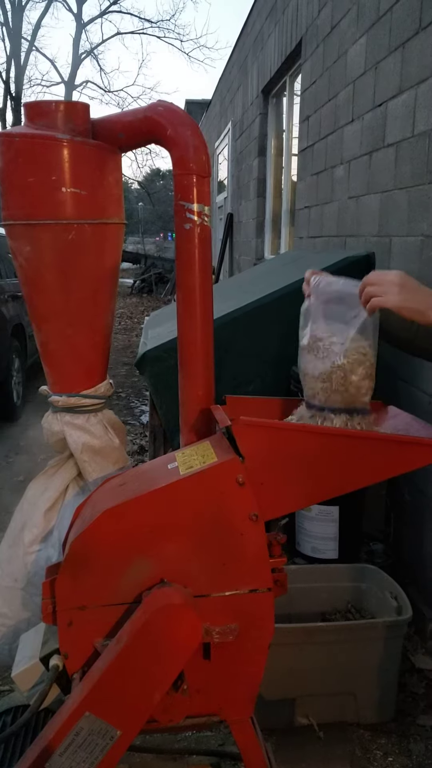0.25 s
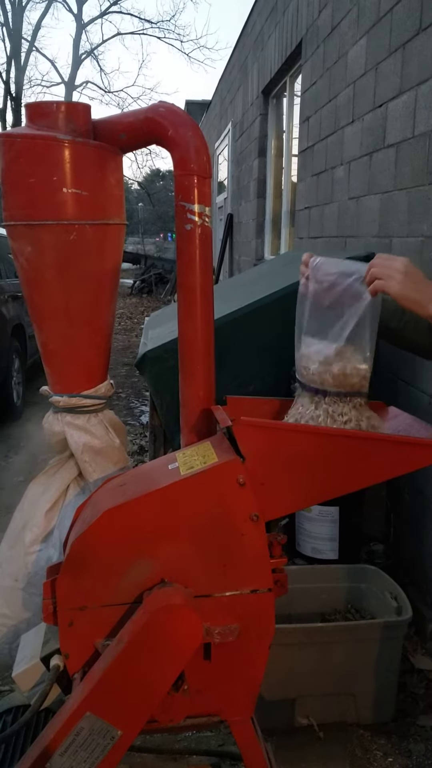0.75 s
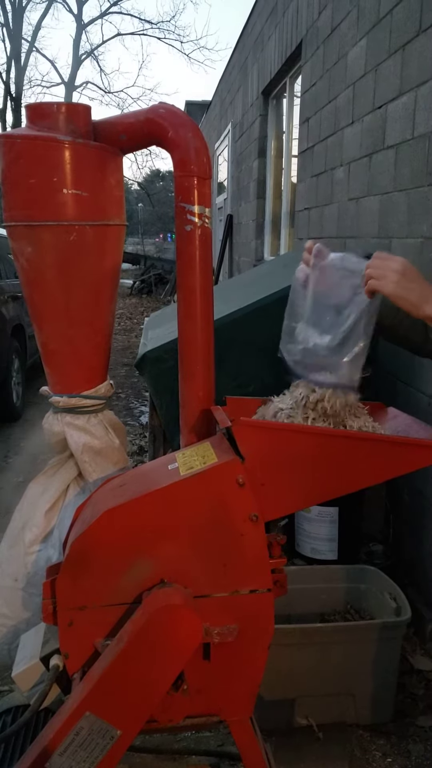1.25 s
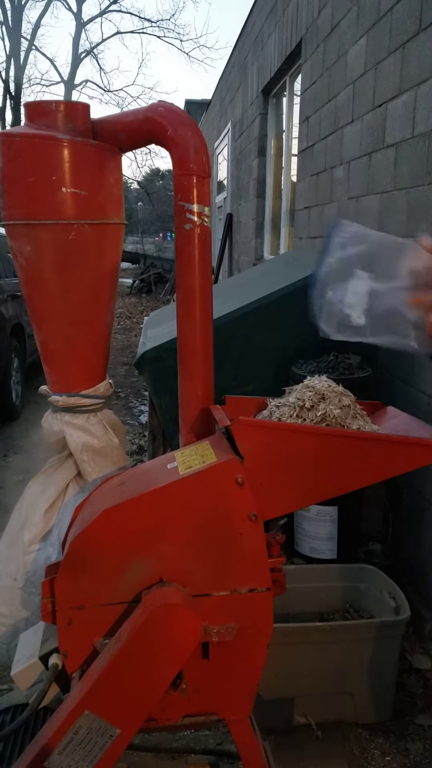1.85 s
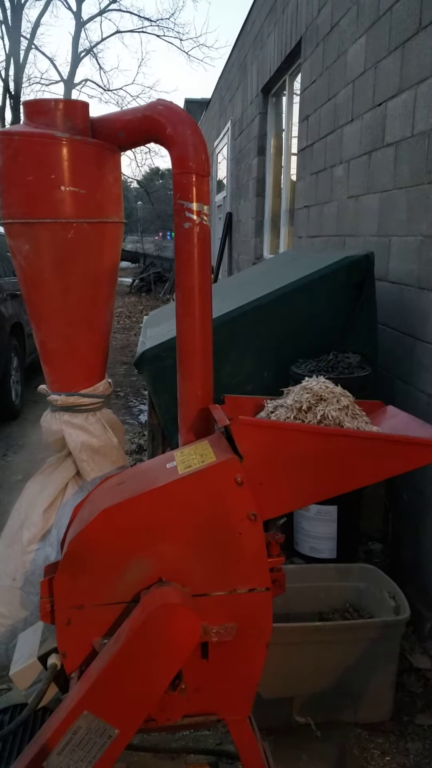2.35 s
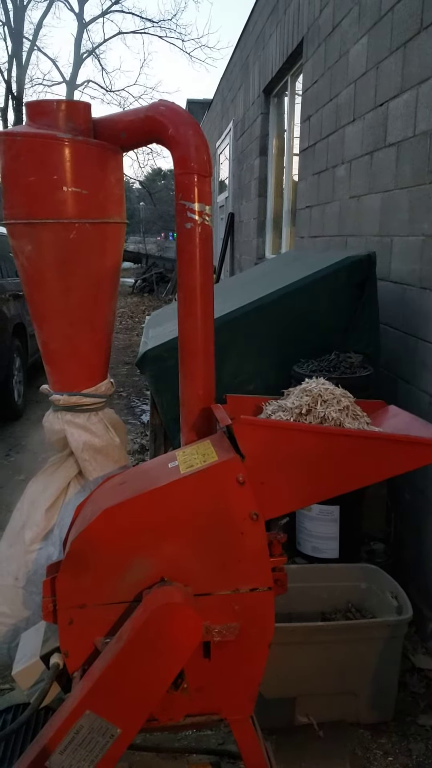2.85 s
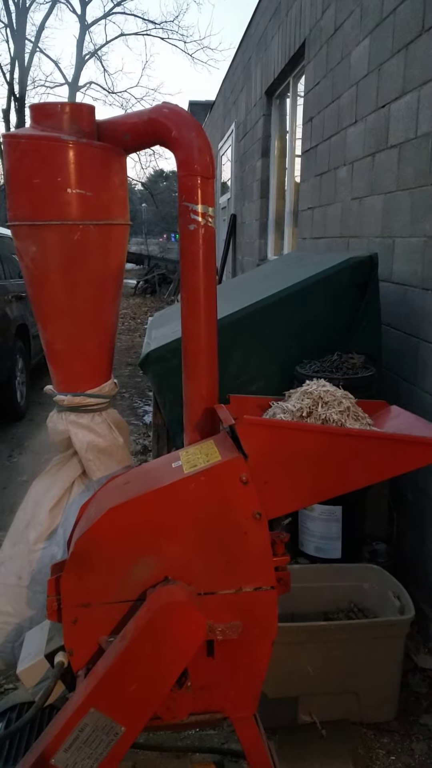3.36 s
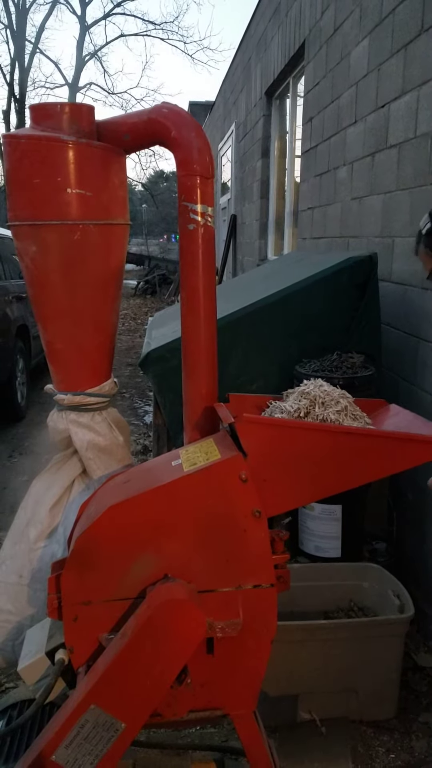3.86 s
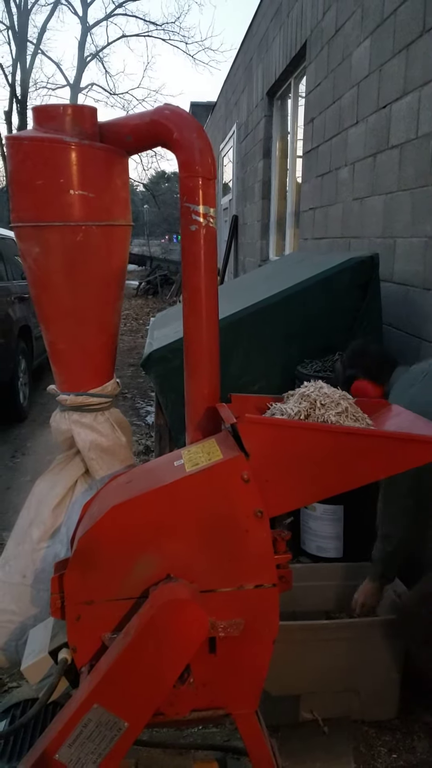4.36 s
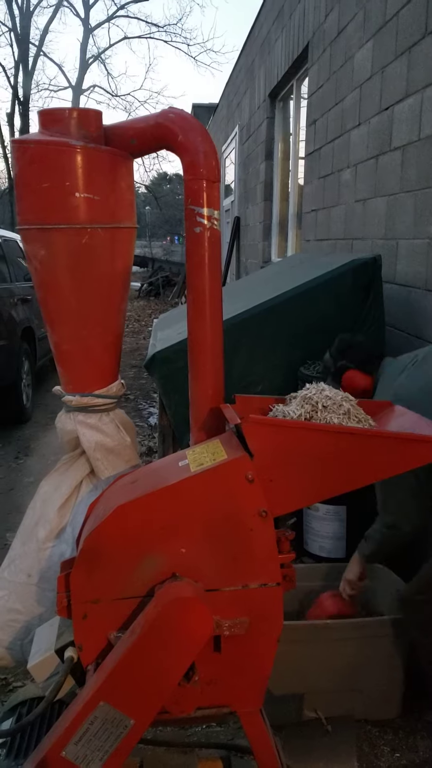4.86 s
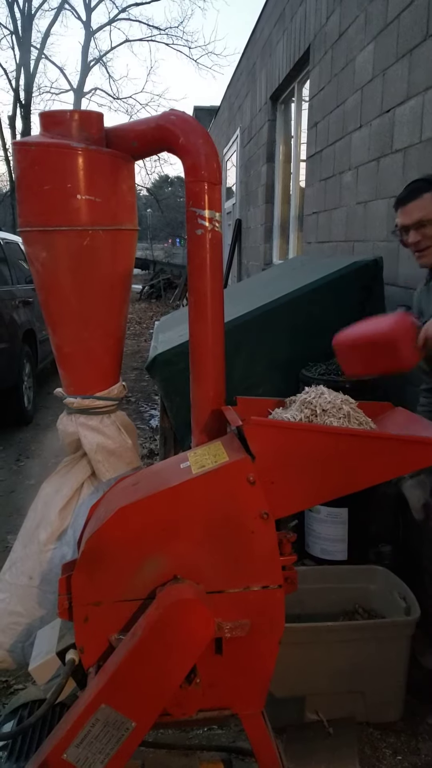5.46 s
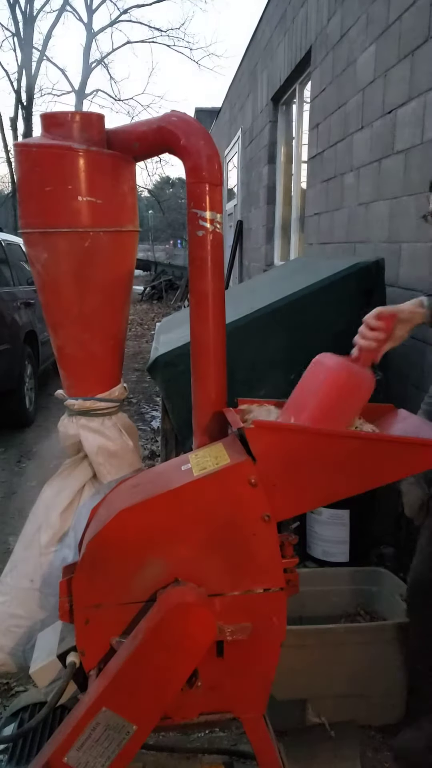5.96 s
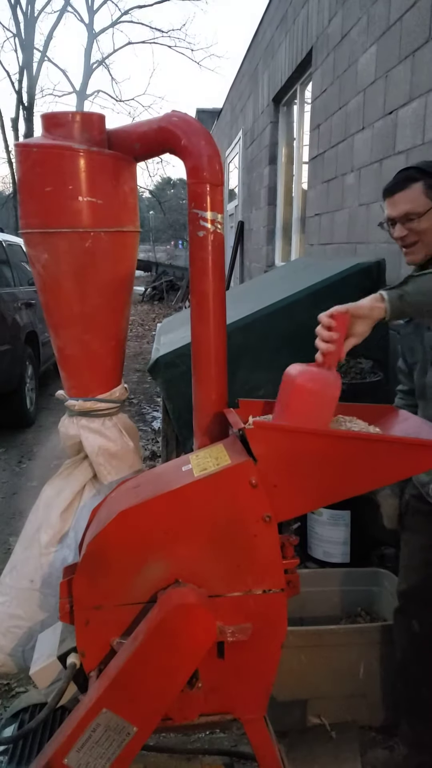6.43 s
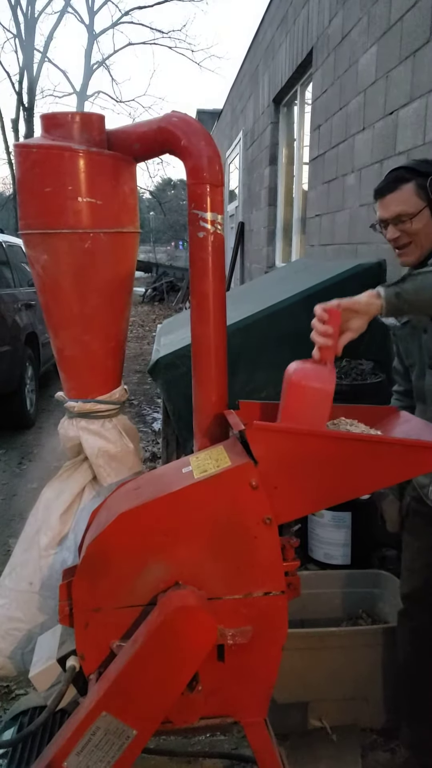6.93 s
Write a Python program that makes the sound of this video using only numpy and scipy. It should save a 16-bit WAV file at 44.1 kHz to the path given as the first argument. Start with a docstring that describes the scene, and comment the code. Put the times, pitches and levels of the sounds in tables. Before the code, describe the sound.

A loud, steady machine drone fills the whole stretch as a grinding mill processes plant material outdoors, close to the microphone. Rushing air and fine chips make a constant roar and hiss around it, and a fuzzy high bearing ring sits mostly to the right. The mill holds one pitch until it slows just a little under load at the end.

```python
"""A deep drone over a roar and a hiss: a hammer mill runs outdoors by a block wall, close to a camera
with two microphone ports. Four rows of hammers drone at four times the shaft speed, and a worn ball
bearing rings and adds tones between the shaft orders. Air and chips roar in the housing and hiss up
the blower pipe. Near the end more feed goes in and the rotor slows a little."""
import sys
import numpy as np
from scipy import signal
from scipy.fft import rfft, irfft, next_fast_len
from scipy.io import wavfile
from scipy.ndimage import uniform_filter1d, map_coordinates

SR = 44100
rng = np.random.default_rng(int(sys.argv[2]) if len(sys.argv) > 2 else 0)


def transcribe(u):
    """Save the signal u as a 16-bit wav file named by the first command-line argument.

    u: samples, shape (n,) or (channels, n), limited to [-1, 1]; the rate is SR.
    q: integer samples, one column per channel.
    """
    v = np.clip(np.atleast_2d(u).T, -1, 1)
    q = np.round(v * 32767).astype(np.int16)
    wavfile.write(sys.argv[1], SR, q)


N = 317067
TIME_S = np.arange(N) / SR
IDLE_HZ, CROSSOVER_HZ = 72.4, 2100  # unloaded shaft speed; where roar gives way to hiss


def amp(db):
    """Gain of a level in dB."""
    return 10 ** (np.asarray(db) / 20)


def unit(x):
    """x at rms 1."""
    return x / np.sqrt(np.mean(x ** 2) + 1e-20)


def along(points, hz):
    """Join (freq_hz, value) points on a log frequency axis."""
    freqs, values = np.transpose(points)
    return np.interp(np.log(hz + 1), np.log(freqs + 1), values)


def curves(rows):
    """One value per sample for each column after time_s."""
    times, *columns = np.transpose(rows)
    return [np.interp(TIME_S, times, column) for column in columns]


def wobble(rate_hz):
    """A smooth random curve with rate_hz knots a second."""
    knots = rng.standard_normal(int(N * rate_hz / SR) + 4)
    return map_coordinates(knots, [np.arange(N) * rate_hz / SR])


def filtered(x, response):
    """x through a complex frequency response."""
    size = next_fast_len(N + SR // 2)
    return irfft(rfft(x, size) * response(np.fft.rfftfreq(size, 1 / SR)), size)[..., :N]


# The mill's run: time_s, shaft_hz, drone_swell_db
MILL_RUN = [(0, 72.1, -.5), (.55, 72.35, -.3), (.85, 72.3, -.1), (1.2, 72.41, -.1), (2.4, 72.44, -.6),
            (3.2, 72.61, -.2), (4.3, 72.68, .7), (4.9, 72.6, 1), (5.4, 72.42, .5), (5.9, 72.32, .5),
            (6.3, 71.97, .1), (6.8, 71.5, -.9), (7.19, 71.25, -1.5)]
def shaft():
    """Speed in Hz, turns so far, and feed load (0-1), which follows the late sag below idle."""
    speed_hz = curves(MILL_RUN)[0]
    sag_hz = np.maximum(IDLE_HZ - speed_hz, 0)
    load = np.tanh(sag_hz / .6) * (np.arange(N) > N / 2)  # mostly full at 0.6 Hz of sag
    return speed_hz, np.cumsum(speed_hz) / SR, load


def tone(cycles, load, columns, waver_db, waver_rad):
    """One machine tone at both microphones, wavering in level and phase and shifting under load."""
    left_db, right_db, lead_rad, drift_db, load_left_db, load_right_db, load_lead_rad = columns
    phase = 2 * np.pi * cycles + waver_rad * wobble(9)
    swell_db = drift_db * np.linspace(-.5, .5, N) + waver_db * wobble(5)
    half_lead = (lead_rad + load_lead_rad * load) / 2
    left = amp(left_db + swell_db + load_left_db * load) * np.cos(phase + half_lead)
    right = amp(right_db + swell_db + load_right_db * load) * np.cos(phase - half_lead)
    return np.sqrt(2) * np.array([left, right])


# Swell of the octave above the drone: time_s, swell_db
OCTAVE_SWELL = [(0, -5), (1.5, 2), (3.1, 3), (4.6, -4.5), (5.7, 0), (6.4, 0), (7.19, -1)]
# Rotor tones at the microphones: shaft_order, left_db, right_db, left_lead_rad, drift_db (start to end),
# then the shifts at full load: load_left_db, load_right_db, load_lead_rad
ROTOR_TONES = [(1, -55.5, -53.6, -0.0, -11.1, 7.0, 3.9, -0.0),
               (2, -40.6, -41.0, -0.2, -1.9, -0.6, -0.3, -0.0),
               (3, -39.7, -39.1, -0.2, 3.2, 3.2, 3.9, -0.1), (4, -20.4, -18.7, -0.2, 0.0, -0.2, 0.2, -0.0),
               (5, -36.3, -36.2, -0.3, -0.2, 0.3, 0.1, 0.1), (6, -30.2, -26.2, 2.4, 0.0, -3.6, 3.6, -0.8),
               (7, -39.7, -44.2, -0.4, -1.7, -4.1, 0.4, -1.0),
               (8, -35.6, -33.4, -2.0, 0.0, 0.4, -0.4, -0.9), (9, -41.7, -39.6, -0.6, 1.5, -3.6, 0.1, -0.3),
               (10, -48.2, -44.7, -0.9, 0.8, 1.3, -3.2, 0.6), (11, -44.2, -46.9, -1.5, 3.1, 3.2, 1.2, 0.8),
               (12, -37.1, -38.9, -0.2, -2.5, -1.6, 3.2, -0.8)]
def hammer_drone():
    """Harmonics of the shaft; four rows of hammers make the fourth the strongest."""
    speed_hz, turns, load = shaft()
    swell_db = {4: curves(MILL_RUN)[1], 6: .5 * (IDLE_HZ - speed_hz), 8: curves(OCTAVE_SWELL)[0]}
    drone = np.zeros((2, N))
    for order, *columns in ROTOR_TONES:
        waver_db, waver_rad = (.2, .02) if order in swell_db else (.9, .08)
        offset = 0 if order <= 6 else rng.random()  # the low orders peak together once a turn
        harmonic = tone(order * turns + offset, load, columns, waver_db, waver_rad)
        drone += amp(swell_db.get(order, 0)) * harmonic
    return drone


# People by the hopper shade or reflect single tones: ball_multiple, shaft_order, time_s, step_db
BYSTANDER_STEPS = [(2, 8, 1.95, -3), (2, 10, 1.95, -3), (2, 11, 1.95, -8), (-1, 10, 3.7, 6)]
# Bearing tones before a small lift per multiple: ball_multiple, shaft_order, the rest as in ROTOR_TONES
BEARING_TONES = [(-1, 10, -38.6, -37.8, -0.1, 1, -1.5, -2, 0.1),
                 (-1, 11, -31.9, -33.2, 0.3, 2.3, -3.7, -5.4, -0.3),
                 (-1, 12, -33.6, -37.7, -0.6, 3.1, -10.1, -7.3, -0.6),
                 (-1, 13, -44.5, -49, -1.3, -2.9, 2.3, -2.4, 0.5),
                 (-1, 14, -45, -45, -1.0, 1.0, -7.2, -2.0, -0.3),
                 (-1, 16, -49.1, -45.4, -1.3, 0.3, 0.8, -0.1, 0.4),
                 (1, 0, -44.7, -45.5, 0.0, -0.7, -0.7, -6.3, 0.3),
                 (1, 1, -45.5, -46.5, 0.1, -5.2, 0.1, -8.4, -0.8),
                 (1, 2, -43.5, -40.7, -0.4, 1.1, 1.2, -2.8, -0.2),
                 (1, 3, -49.0, -43.1, -0.1, -0.1, -1.7, -3.1, -0.8),
                 (1, 4, -34.4, -36.4, -0.3, -1.3, -0.4, 1.9, 0.1),
                 (1, 5, -51, -46, -0.9, -0.3, -1.2, -7.0, 1.0),
                 (1, 6, -46, -46, -0.6, 1.8, -4.2, -1.1, -1.3),
                 (1, 7, -45.4, -51.5, -1.3, -3.6, 5.1, 4.5, 1.6),
                 (2, 4, -42.4, -34.6, 2.0, -2.1, 3.6, -1.6, -0.8),
                 (2, 5, -35.9, -34.2, 2.9, 1.0, -4.4, 2.2, 2.2),
                 (2, 6, -34.4, -31.8, 2.7, -1.3, -1.2, -4.9, -1.1),
                 (2, 7, -33.1, -30.0, -2.3, -0.1, 1.4, 0.0, -0.3),
                 (2, 8, -49.7, -37, -1.1, 0, -5.2, 0, -1.6), (2, 10, -46.9, -40, -1.9, 1, 1.6, -8.9, 0.1),
                 (2, 11, -49, -40.5, -1.0, -2, -1.6, -3, -0.3),
                 (3, 10, -44.5, -42.8, -1.9, 3.9, -3.0, -3.6, -0.3)]
def bearing_tones():
    """Balls pass a flaw in the inner race; the turning load spreads each multiple into sidebands."""
    speed_hz, turns, load = shaft()
    passes_per_turn = 5.332 - .0058 * TIME_S  # the balls creep back in their race
    passes = np.cumsum(passes_per_turn * speed_hz) / SR
    tones = np.zeros((2, N))
    for multiple, order, *columns in BEARING_TONES:
        shade_db = sum(step_db / 2 * np.tanh((TIME_S - time_s) / .15)
                       for m, k, time_s, step_db in BYSTANDER_STEPS if (m, k) == (multiple, order))
        cycles = multiple * passes + order * turns + rng.random()
        sideband = tone(cycles, load, columns, waver_db=.96, waver_rad=.12 * abs(multiple))
        tones += amp(.47 * abs(multiple) + shade_db) * sideband
    return tones


def turbulence(depth_db):
    """Two white noises that share patches of random gain in time and frequency."""
    spectra = signal.stft(rng.standard_normal((2, N)), nperseg=512)[2]
    patches = rng.standard_normal(spectra.shape[1:])
    patches = uniform_filter1d(uniform_filter1d(patches, 6, axis=0), 10, axis=1)
    return signal.istft(spectra * amp(depth_db * unit(patches)), nperseg=512)[1][:, :N]


# Likeness of the air noise at the two microphones: freq_hz, correlation
MIC_LIKENESS = [(60, 1), (250, 1), (500, 1), (900, 0.32), (1400, 0.34), (3000, 0.19), (6000, 0.1),
                (15000, 0.2)]
# How far the left microphone is ahead: freq_hz, lead_rad
MIC_LEAD = [(60, 1), (300, -1), (700, 0.8), (950, 0.5), (1250, 2.5), (1800, 5.5), (2300, 9.5), (15000, 39)]
def at_microphones(noises, spectra, band):
    """Two unrelated noises reach the ports partly alike, one port ahead, each with its own colour."""
    def blend(hz):
        angle = np.arccos(np.clip(along(MIC_LIKENESS, hz), -1, 1)) / 2
        return band(hz) * np.array([np.cos(angle), np.sin(angle)])

    def colour(hz):
        return [amp(along(spectrum, hz)) * np.exp(sign * .5j * along(MIC_LEAD, hz))
                for spectrum, sign in zip(spectra, (1, -1))]

    mid, side = filtered(noises, blend)
    return unit(filtered(np.array([mid + side, mid - side]), colour))


# Resonances of the mill's panels and the microphone ports: pitch_hz, width_hz, left_db, right_db
PANEL_AND_PORT_MODES = [(886, 43, 4.5, 2), (1090, 100, 4.5, 1), (1703, 160, 5, 3), (6540, 300, -4, 6),
                        (2144, 57, 7, 5), (2316, 70, 11, 8.5), (2487, 89, 6, 5.5), (3740, 130, -0.5, 3.5),
                        (4510, 20, -5, 9.5), (4670, 39, 6, 3), (4930, 55, 11.5, 0.5), (5300, 250, 1, 6.5),
                        (5790, 150, 6, 5), (5920, 160, 5.5, 5.5), (6390, 140, 11, 4), (7430, 60, 12.5, -2),
                        (9130, 60, 0, 8), (15450, 570, 1, 8.5)]
def panels_and_ports(hz):
    """Gain at each microphone of the resonances that colour the air noise."""
    return amp(sum(np.outer([left_db, right_db], 1 / (1 + (2 * (hz - pitch_hz) / width_hz) ** 2))
                   for pitch_hz, width_hz, left_db, right_db in PANEL_AND_PORT_MODES))


def low_band(hz):
    """The roar's side of the crossover; the hiss takes the rest."""
    return 1 / (1 + (hz / CROSSOVER_HZ) ** 12)


# Colour of the housing at the left, then the right microphone: freq_hz, relative_db
ROAR_SPECTRA = [
    [(25, -30), (45, -21), (70, -14.5), (110, -12.5), (160, -7.5), (300, 0), (450, -2.5), (700, -4),
     (1000, -3.5), (1300, -4), (1900, -8), (2300, -9.5)],
    [(25, -30), (45, -19), (70, -16), (110, -12), (160, -8), (300, -1.5), (450, -4.5), (700, -10),
     (1000, -2.5), (1300, 1), (1900, -3.1), (2300, -8)],
]
def housing_roar():
    """Air churned inside the housing."""
    air = at_microphones(turbulence(depth_db=.6), ROAR_SPECTRA, low_band)
    return amp(-27) * unit(filtered(air, panels_and_ports))


# The treble beats with the rotor: shaft_order, depth_fraction
HISS_THROB = [(1, 0.03), (3, 0.05)]
# Colour of the pipe at the left, then the right microphone: freq_hz, relative_db
HISS_SPECTRA = [
    [(1900, 0), (2300, -7), (3300, -4.5), (4500, -5.5), (5600, -9), (7500, -10.5), (8800, -19.5),
     (10500, -14), (14500, -11), (15700, -31)],
    [(1900, 11.5), (2300, -2.5), (3200, -7), (4300, 0.5), (5550, 0.5), (6200, -6.5), (7100, -9.5),
     (7700, -6), (8600, -10.5), (10700, -12.5), (12200, -1), (13800, -10), (15700, -7)],
]
def pipe_hiss():
    """Air rushes up the blower pipe, with fine chips pattering against the steel."""
    count = int(2500 * N / SR)  # 2500 chips a second
    chips = np.zeros((2, N))
    chips[rng.integers(0, 2, count), rng.integers(0, N, count)] = rng.standard_normal(count)
    stream = turbulence(depth_db=1.1) + amp(-8) * unit(chips)
    flow_db = -25.5 - .03 * wobble(3) + .15 * wobble(8)
    pipe = at_microphones(stream, HISS_SPECTRA, lambda hz: 1 - low_band(hz))
    _, turns, _ = shaft()
    throb = 1 + sum(depth * np.cos(2 * np.pi * (order * turns + rng.random()))
                    for order, depth in HISS_THROB)
    return amp(flow_db) * throb * unit(filtered(pipe, panels_and_ports))


# The bearing's lower mode: time_s, pitch_hz
RING_PITCH = [(0, 5520), (2.2, 5522), (3.5, 5532), (4.6, 5570), (5.2, 5564), (6.7, 5528), (7.19, 5540)]
# Its upper mode at the right microphone: time_s, level_db
UPPER_RING_LEVEL = [(0, -40), (3.4, -38), (4.2, -37), (6.1, -37.5), (6.8, -44), (7.19, -55)]
def bearing_ring(half_width_hz=46, beat_depth=.45, steady_core=.6):
    """Ball impacts ring the bearing's steel once a turn: two fuzzy whistles, mostly on the right."""
    fuzz = filtered(rng.standard_normal((4, N)), lambda hz: 1 / (1 + (hz / half_width_hz) ** 4))
    phase = 2 * np.pi * np.cumsum(curves(RING_PITCH)[0]) / SR
    _, turns, _ = shaft()
    beat = 1 + beat_depth * np.cos(2 * np.pi * turns)

    def mode(core_fuzz, edge_fuzz, pitch_ratio):
        core = (unit(core_fuzz) + steady_core) * np.cos(pitch_ratio * phase + 4 * wobble(12))
        edge = unit(edge_fuzz) * np.sin(pitch_ratio * phase)
        return unit(beat * (core + edge))

    upper = amp(curves(UPPER_RING_LEVEL)[0]) * mode(*fuzz[2:], pitch_ratio=1.108)
    lower = amp(-33.5) * mode(*fuzz[:2], pitch_ratio=1)
    return amp([[-13], [0]]) * (lower + upper)


def scene():
    """The whole mill from close by; every layer sounds from the start."""
    return hammer_drone() + bearing_tones() + housing_roar() + pipe_hiss() + bearing_ring()


def record(dry):
    """The camera keeps nothing above its band limit."""
    return filtered(dry, lambda hz: hz < 15780)


dry = scene()
out = record(dry)
transcribe(out)
```